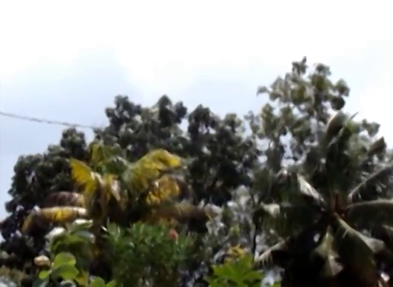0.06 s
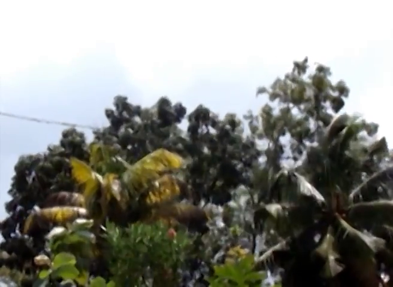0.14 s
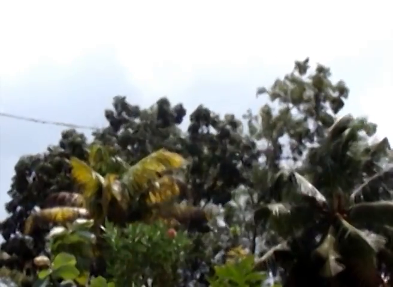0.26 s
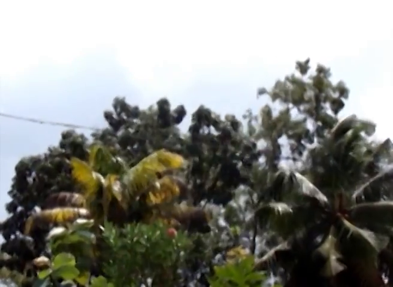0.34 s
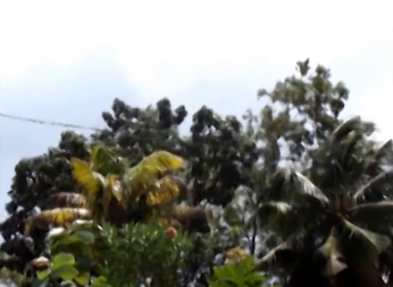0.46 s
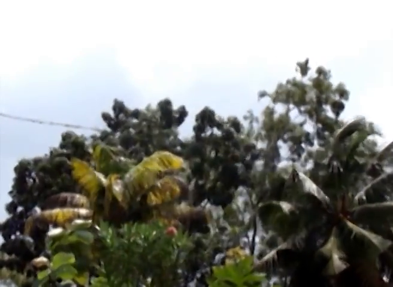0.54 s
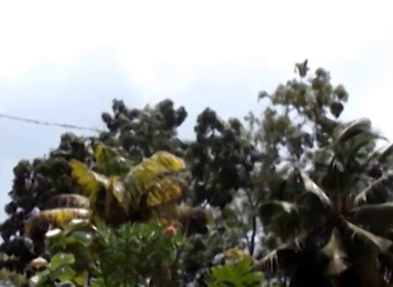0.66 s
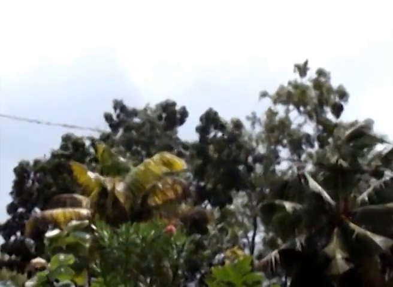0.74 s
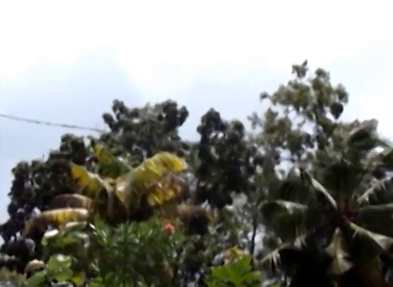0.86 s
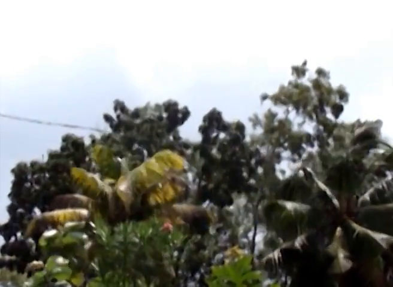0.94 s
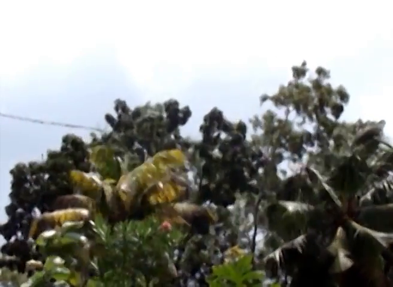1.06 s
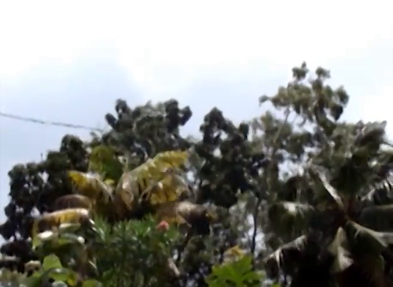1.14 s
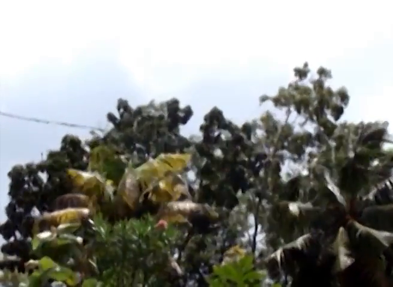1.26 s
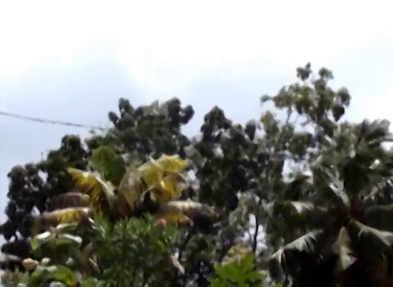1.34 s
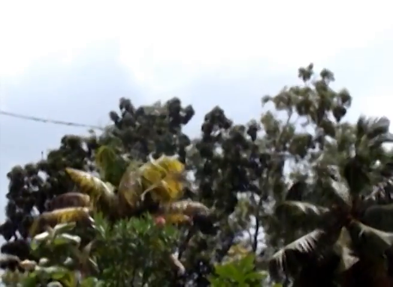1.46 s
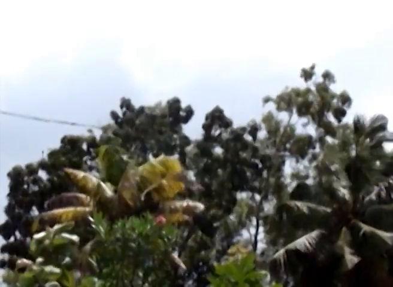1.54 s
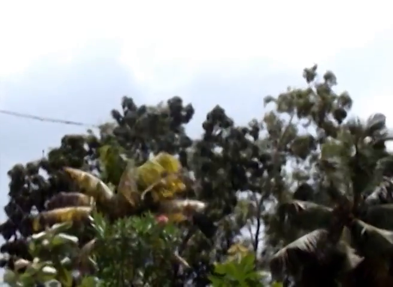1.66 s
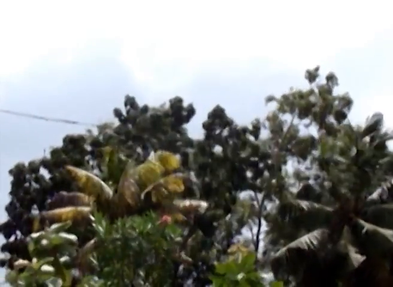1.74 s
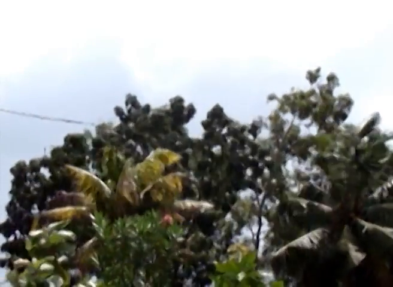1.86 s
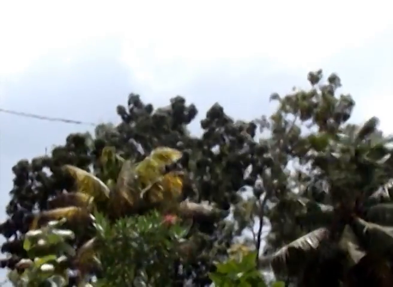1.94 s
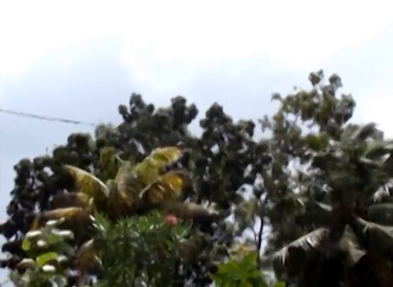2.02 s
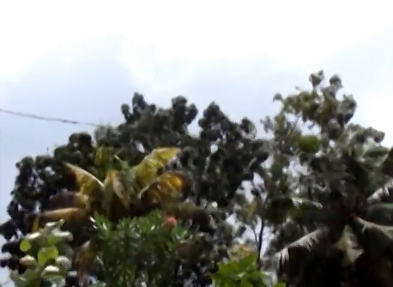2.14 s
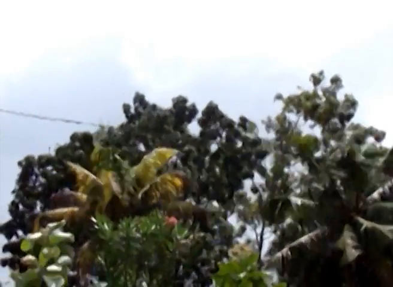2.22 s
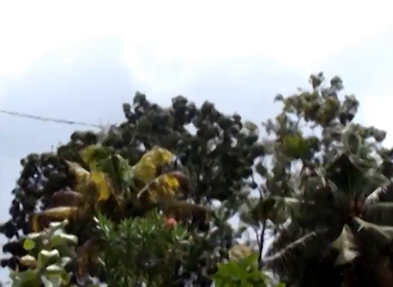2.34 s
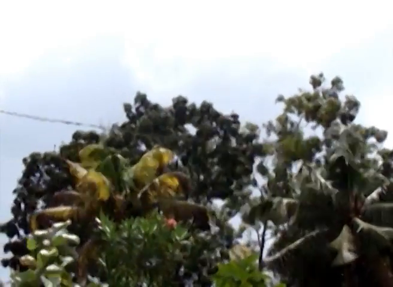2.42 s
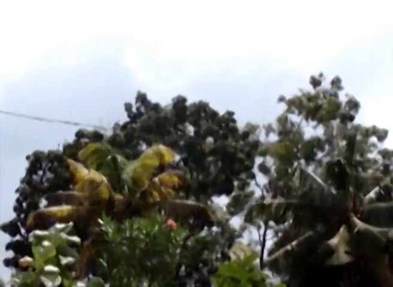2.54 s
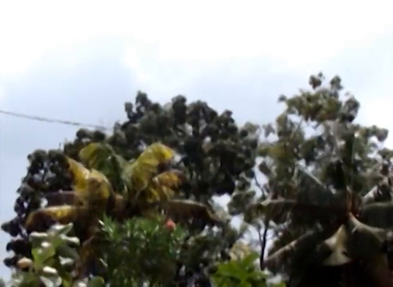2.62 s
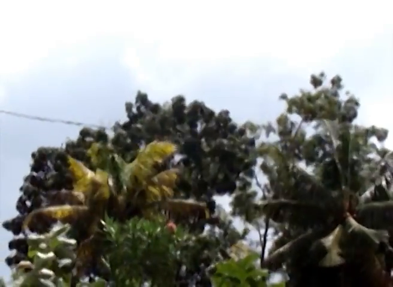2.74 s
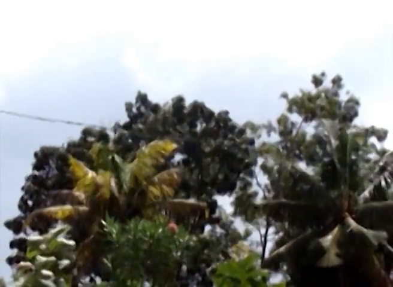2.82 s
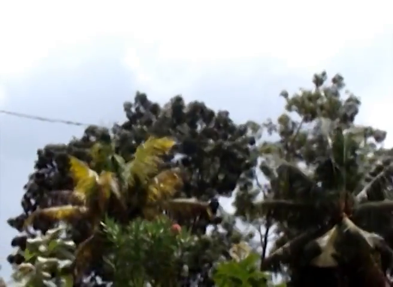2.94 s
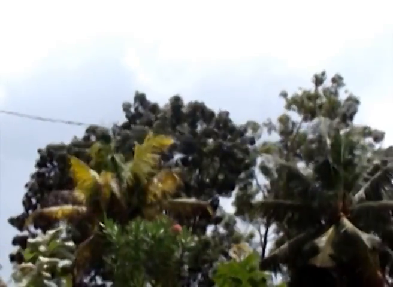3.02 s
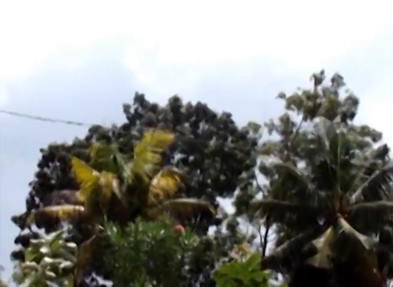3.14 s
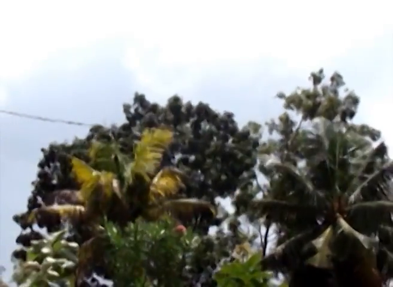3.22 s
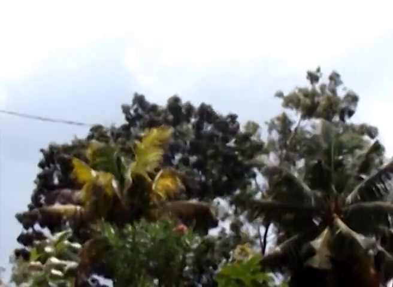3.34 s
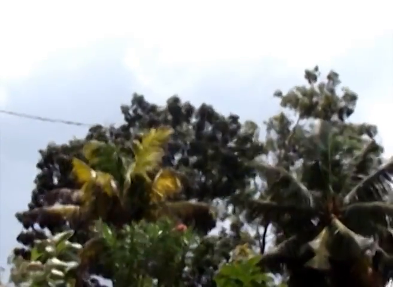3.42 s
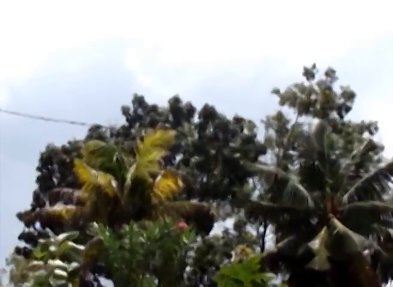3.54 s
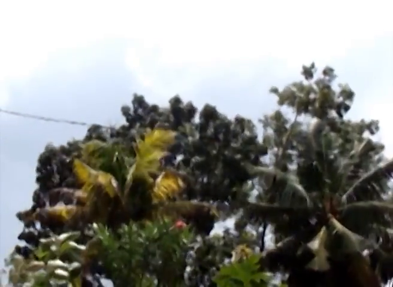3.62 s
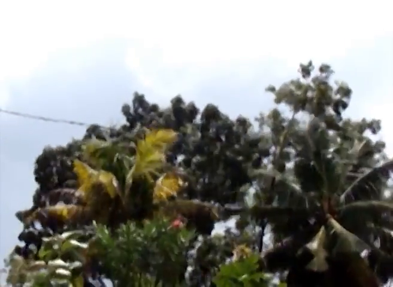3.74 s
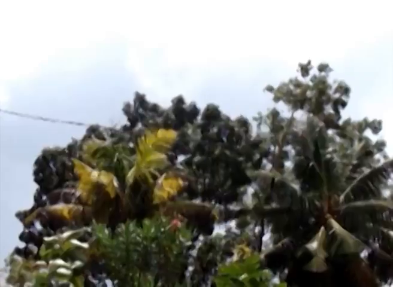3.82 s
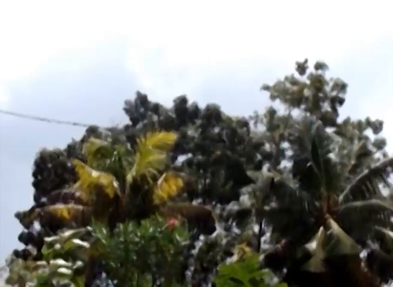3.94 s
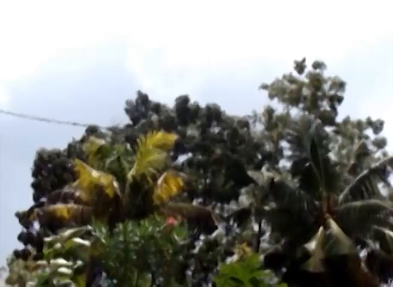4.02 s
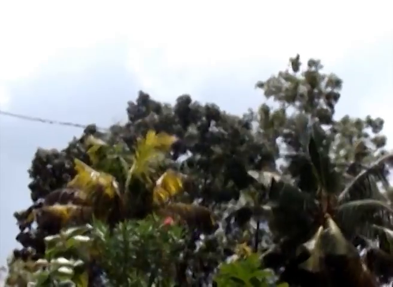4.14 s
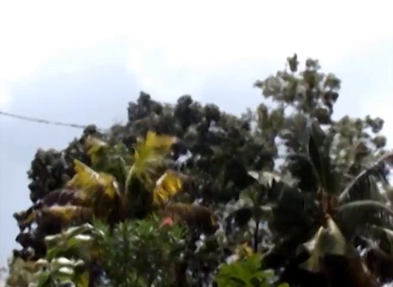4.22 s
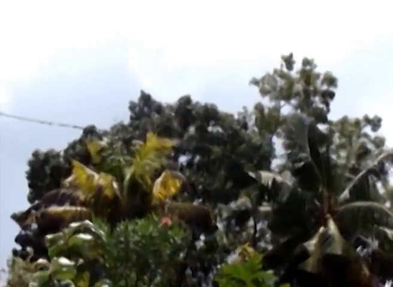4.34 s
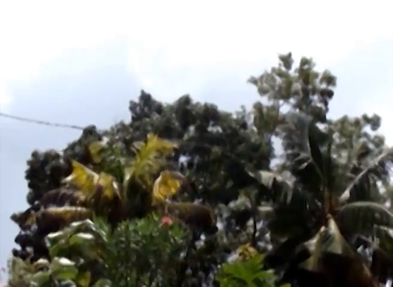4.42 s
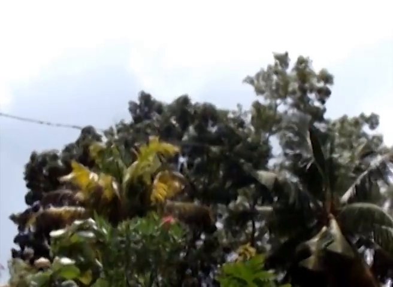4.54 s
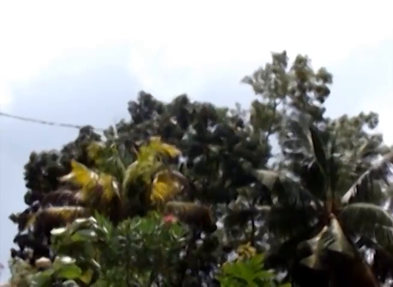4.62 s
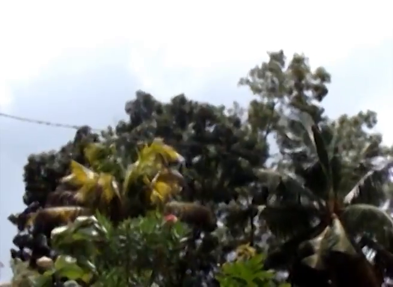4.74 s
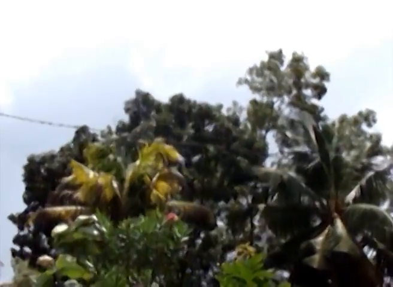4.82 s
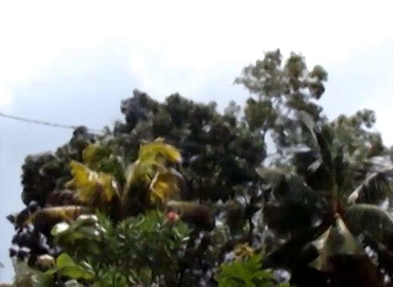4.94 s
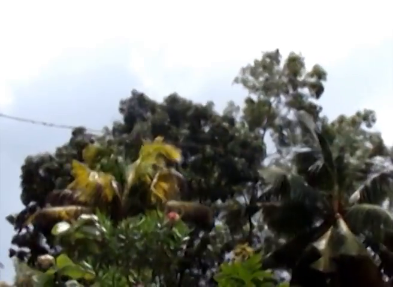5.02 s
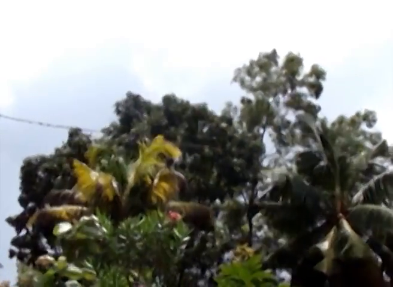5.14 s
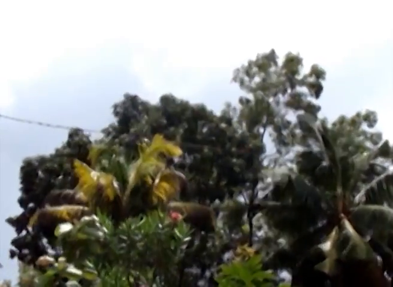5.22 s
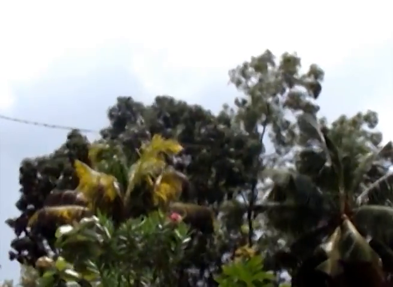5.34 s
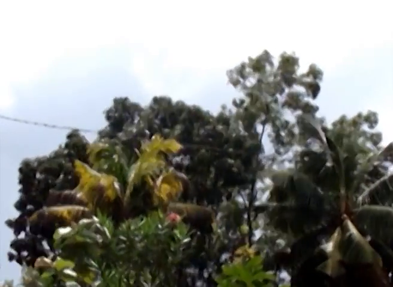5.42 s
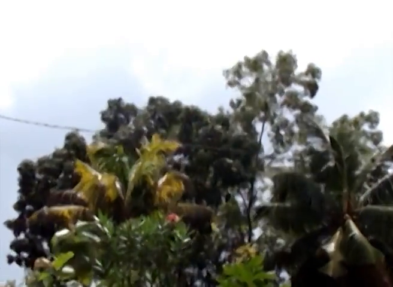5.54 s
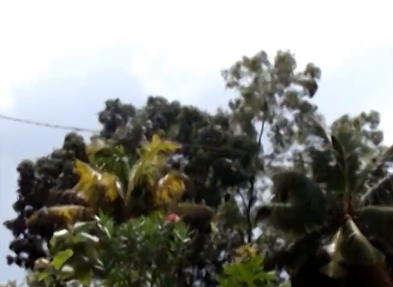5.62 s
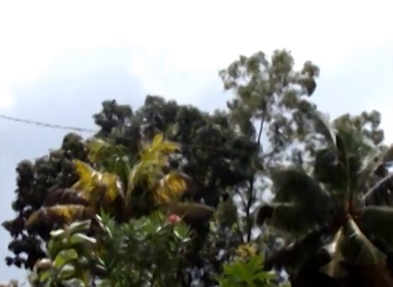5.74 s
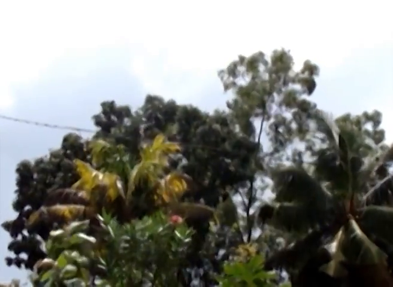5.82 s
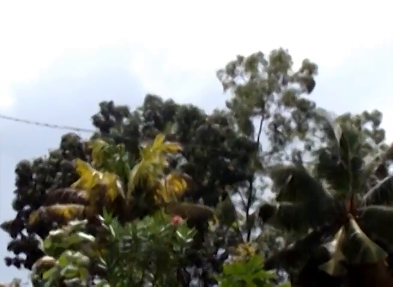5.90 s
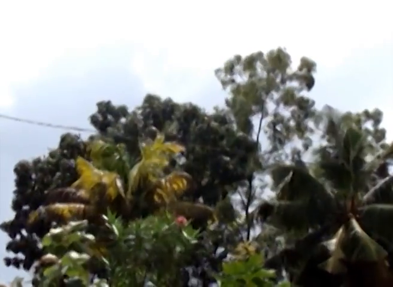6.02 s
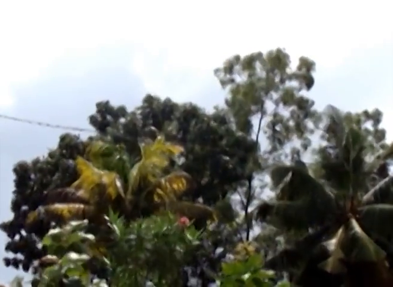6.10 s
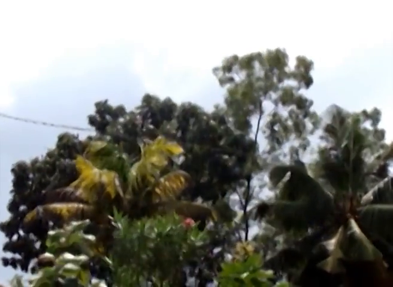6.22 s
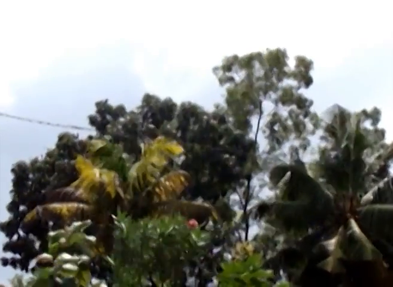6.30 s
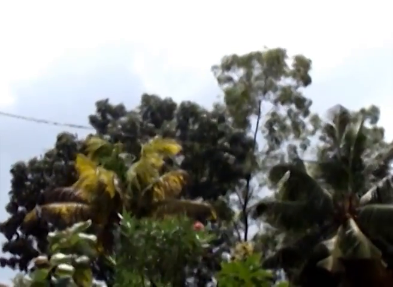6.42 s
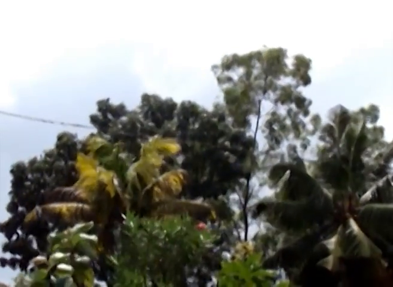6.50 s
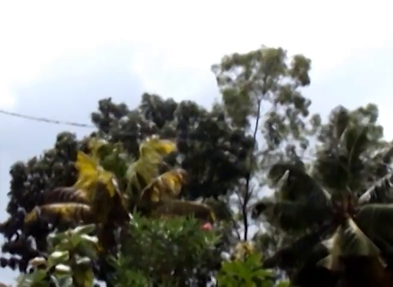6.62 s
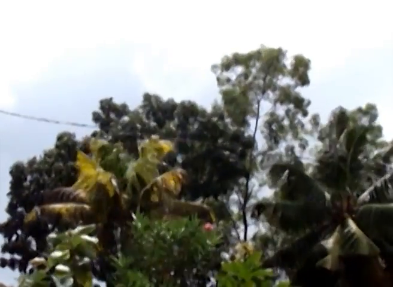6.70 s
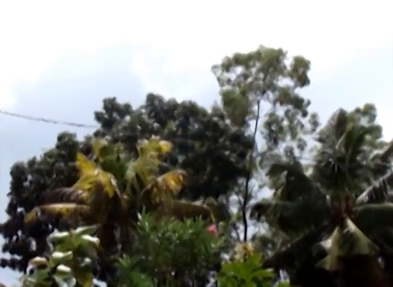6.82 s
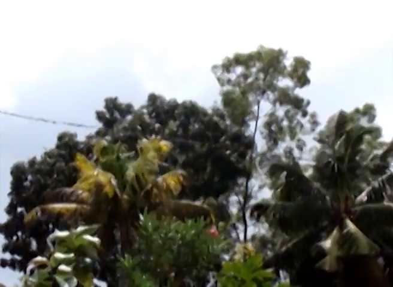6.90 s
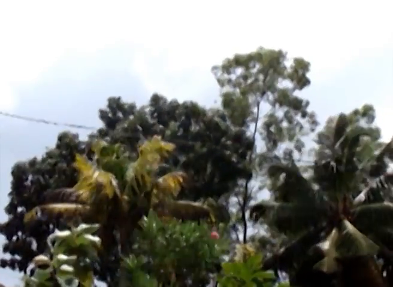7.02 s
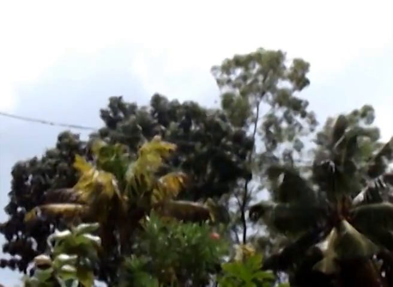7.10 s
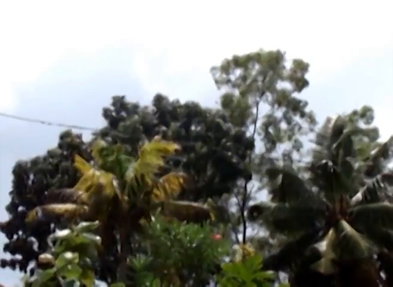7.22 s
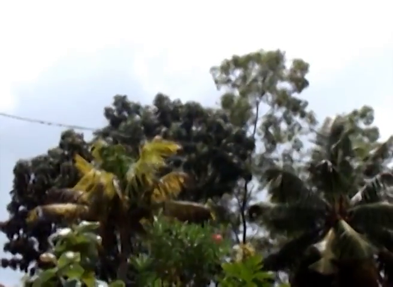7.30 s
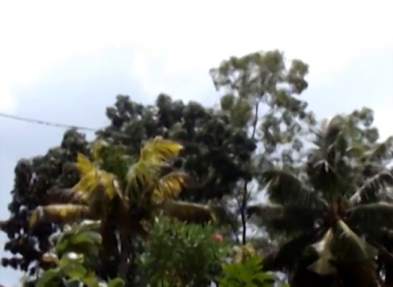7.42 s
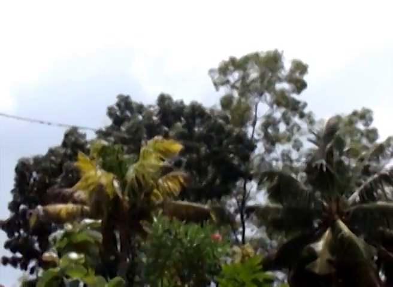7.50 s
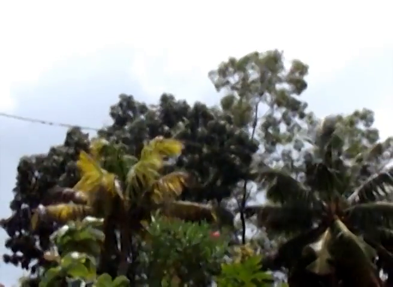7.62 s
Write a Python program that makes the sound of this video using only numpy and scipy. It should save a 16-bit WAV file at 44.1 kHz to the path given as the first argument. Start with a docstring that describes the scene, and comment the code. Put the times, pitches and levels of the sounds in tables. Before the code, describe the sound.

A gust of wind swells and dies away through palm fronds and tall trees, with a faint distant engine and one bird chirp.

```python
"""Gust in a palm garden

A gust swells and dies away through coconut palms, banana plants and tall trees. The far crowns
roar softly; nearer, countless stiff leaflets brush and tick against each other in flurries.
Behind them a distant engine speeds up and fades, something hoots faintly, and a bird chirps once.
The sound is the same in both ears."""
import sys
import numpy as np
from scipy import signal
from scipy.fft import rfft, irfft, next_fast_len
from scipy.io import wavfile
from scipy.ndimage import uniform_filter1d, map_coordinates

SR = 44100
rng = np.random.default_rng(int(sys.argv[2]) if len(sys.argv) > 2 else 0)


def to_wav(s):
    """Save 16-bit WAV."""
    ch = np.atleast_2d(s).T  # columns
    pcm = np.round(np.clip(ch, -1, 1) * 32767)  # PCM
    wavfile.write(sys.argv[1], SR, pcm.astype(np.int16))


N = 337806

# tone colour of leaflets rubbing and tapping: f/Hz, level/dB
LEAFLET_SPECTRUM = [(200, -34.5), (700, -13), (1500, -10), (2500, -5.5), (3400, -5.5), (4400, -5),
                    (5300, -1.5), (6500, 0.16), (7100, -2.5), (8000, -10.5), (9000, -17), (10000, -24.5)]


def undb(db):
    """Decibels to gain."""
    return 10 ** (np.asarray(db) / 20)


def unit(x):
    """Scale to rms 1."""
    return x / np.sqrt(np.mean(x ** 2))


def drift(rate_hz):
    """Smooth random modulation with `rate_hz` new values a second; rms 1."""
    knots = rng.standard_normal(4096)
    return unit(map_coordinates(knots, [np.arange(N) / SR * rate_hz], order=3, mode="wrap"))


def colour(x, spectrum):
    """EQ through (f/Hz, level/dB) points; rms 1."""
    hz, db = np.transpose(spectrum)
    size = next_fast_len(N + 4096)
    f = np.maximum(np.fft.rfftfreq(size, 1 / SR), 1)
    gain = undb(np.interp(np.log(f), np.log(hz), db))
    return unit(irfft(rfft(x, size) * gain, size)[:N])


def band(x, low_hz, high_hz):
    """Gentle band-pass."""
    edges = [low_hz, min(high_hz, SR / 2 - 1)]
    return signal.sosfilt(signal.butter(2, edges, "band", fs=SR, output="sos"), x)


def gust(light_wind_db=-28):
    """The foliage's envelope in dB above a light wind: one gust, with a lift for each swinging frond."""
    # strength of the wind in the leaves: t/s, level/dB
    strength = [(0.0, -23), (0.08, -25.5), (1.15, -22), (1.23, -19.5), (1.73, -20.5), (1.9, -18.5),
                (1.94, -20.5), (2.92, -17.5), (3.07, -20.5), (3.8, -22.5), (4.08, -22.5), (4.95, -26.5),
                (6.21, -28), (7.66, -28)]
    # single fronds swing and lift the rustle: crest t/s, length/s, lift/dB
    swings = [(0.55, 0.32, .6), (1.41, .2, 0.4), (2.253, 0.11, 0.7), (5.605, 0.13, 0.5), (6.52, .14, 1.1),
              (7.61, .16, 0.5)]
    t = np.arange(N) / SR
    lifts_db = sum(db * np.cos(np.pi * np.clip((t - crest) / length, -.5, .5)) ** 2
                   for crest, length, db in swings)
    return np.interp(t, *np.transpose(strength)) - light_wind_db + lifts_db


def engine(top_hz=113.2, top_s=3.85, rise_hz_per_s=10.3, ease_hz_per_s=11, attack_s=.13, release_s=.06):
    """A far engine speeds up and eases off; only its lowest partials carry, wavering in the wind."""
    # exhaust note: multiple of the firing rate, level/dB
    partials = [(1, 0.5), (2, -7.5), (3, -19)]
    # the drone carries over in swells: start t/s, length/s, level/dB
    swells = [(2.47, 1.22, -49.3), (4.03, .04, -51.5), (4.23, .11, -55.5)]
    t = np.arange(N) / SR
    envelope = np.zeros(N)
    for start, length, db in swells:
        fade = np.maximum(start - t, 0) / attack_s + np.maximum(t - start - length, 0) / release_s
        envelope = np.maximum(envelope, undb(db) * np.exp(-fade))
    firing_hz = top_hz - np.maximum(rise_hz_per_s * (top_s - t), ease_hz_per_s * (t - top_s))
    phase = 2 * np.pi * np.cumsum(firing_hz * (1 + .004 * drift(12))) / SR
    drone = 0
    for k, db in partials:
        waver_db = 3 if k > 1 else 1
        drone += np.sin(k * phase) * undb(db + waver_db * drift(7))
    return np.sqrt(2) * drone * envelope


def call(start_s, length_s, pitch_hz, level_db, scoop, droop, quaver, attack_s, release_s):
    """A nearly pure note slides in as it swells and droops as it ends; the trees scatter it a little."""
    t = np.arange(N) / SR
    attack = np.clip((t - start_s) / attack_s, 0, 1)
    release = np.clip((start_s + length_s - t) / release_s, 0, 1)
    hz = pitch_hz * (1 - scoop * (1 - attack) ** 2 - droop * (1 - release))
    phase = 2 * np.pi * np.cumsum(hz * (1 + quaver * drift(250))) / SR
    note = np.sqrt(2) * np.sin(phase) * undb(level_db) * attack * np.sqrt(release)
    scatter = rng.standard_normal(N) * np.exp(-t / .05)
    echo = signal.fftconvolve(note, scatter / np.linalg.norm(scatter))[:N]
    return note + undb(-15) * echo


def crowns(gust_db, level_db=-33, follow=.33, lead_s=.16, blur_s=.5):
    """Far trees blur into a soft roar; the gust reaches them first, and each octave wavers a little."""
    # tone colour of the far crowns: f/Hz, level/dB
    roar_spectrum = [(20, -35.5), (35, -25.5), (60, -15), (100, -10.5), (160, -8.5), (220, -4.5),
                     (400, -0.5), (800, -1), (1400, -0.5), (2500, -5), (4000, -8), (6500, -5.5),
                     (10000, -34)]
    octaves_hz = 20 * 2. ** np.arange(10)
    air = sum(band(rng.standard_normal(N), hz, 2 * hz) * undb(.4 * drift(6)) for hz in octaves_hz)
    t = np.arange(N) / SR
    far_gust_db = np.interp(t + lead_s, t, uniform_filter1d(gust_db, int(blur_s * SR)))
    return colour(air, roar_spectrum) * undb(level_db + follow * far_gust_db)


def contacts(rate, spread_db):
    """Random leaf contacts at `rate` a second: many soft ones, a few hard; rms 1."""
    happens = rng.random(N) < rate / SR
    force = undb(spread_db * np.minimum(rng.exponential(size=N), 3.5))
    return unit(happens * force * rng.choice([-1, 1], N) / np.sqrt(rate))


def flurries(gust_db, base_db=-40, base_ticks_per_s=260, bunch_db=3, ring_s=.00073):
    """The nearest fronds flap, and their stiff edges clatter in short runs of dry ticks."""
    hits = contacts(base_ticks_per_s * undb(gust_db), spread_db=4.5) * undb(bunch_db * drift(24))
    age = np.arange(512) / SR
    energy = signal.fftconvolve(hits ** 2, np.exp(-2 * age / ring_s))[:N]
    ticks = np.sqrt(np.maximum(energy, 0)) * rng.standard_normal(N)  # a tiny noise burst for each hit
    return colour(ticks, LEAFLET_SPECTRUM) * undb(base_db + gust_db)


def leaflets(gust_db, base_db=-28, base_taps_per_s=5500, sway_db=.2, flutter_db=.7, brighten=.031):
    """Leaflets of each size rustle in their own band; more wind makes more, harder, brighter taps."""
    edges_hz = np.geomspace(300, 11000, 10)
    rustle = 0
    for low, high in zip(edges_hz, edges_hz[1:]):
        taps = band(contacts(base_taps_per_s * undb(gust_db), spread_db=2), low, high)
        motion_db = sway_db * drift(6.8) + flutter_db * drift(32)
        tilt_db = brighten * np.log2(high / edges_hz[-2]) * gust_db
        rustle += taps * undb(motion_db + tilt_db)
    return colour(rustle, LEAFLET_SPECTRUM) * undb(base_db + gust_db)


def scene():
    """One gust drives all the foliage; the engine and the calls sit behind it."""
    gust_db = gust()
    foliage = crowns(gust_db) + leaflets(gust_db) + flurries(gust_db)
    chirp = call(start_s=4.528, length_s=.096, pitch_hz=1905, level_db=-32.5,
                 scoop=.22, droop=.07, quaver=.018, attack_s=.056, release_s=.016)
    hoot = call(start_s=.51, length_s=.19, pitch_hz=224, level_db=-45.5,
                scoop=-.065, droop=.13, quaver=.009, attack_s=.037, release_s=.17)
    garden = engine() + hoot + chirp + foliage
    return np.array([garden, garden])


def record(dry, cutoff_hz=10050):
    """A steep low-pass takes off the top end."""
    return signal.sosfilt(signal.ellip(12, .1, 85, cutoff_hz, fs=SR, output="sos"), dry)


dry = scene()
out = record(dry)
to_wav(out)
```